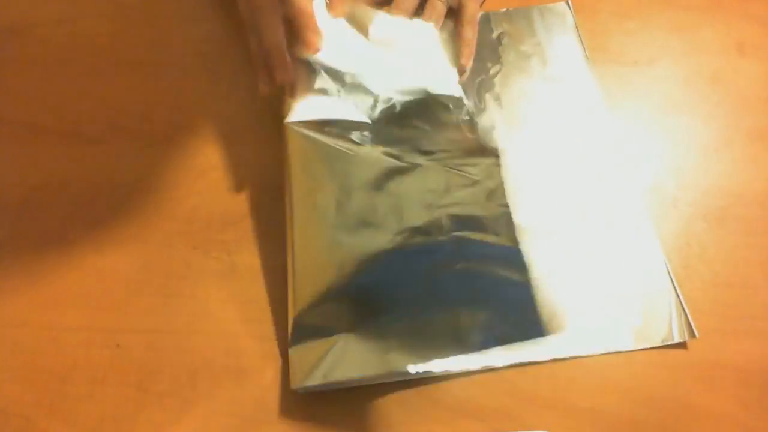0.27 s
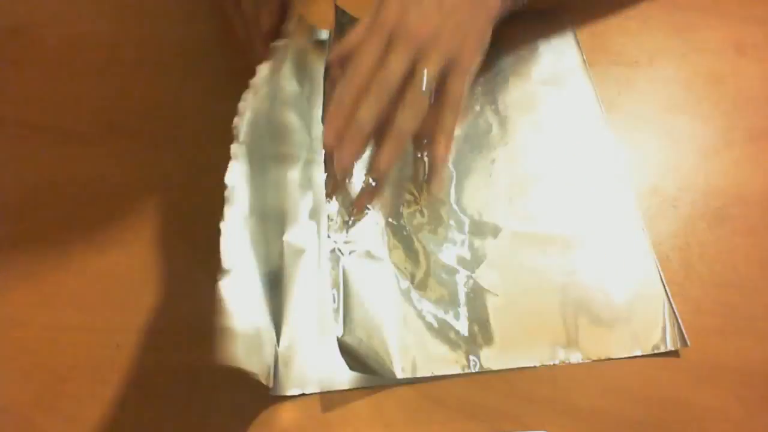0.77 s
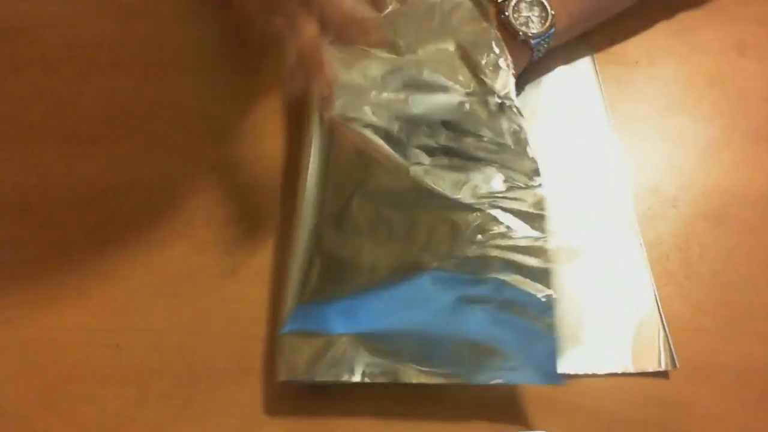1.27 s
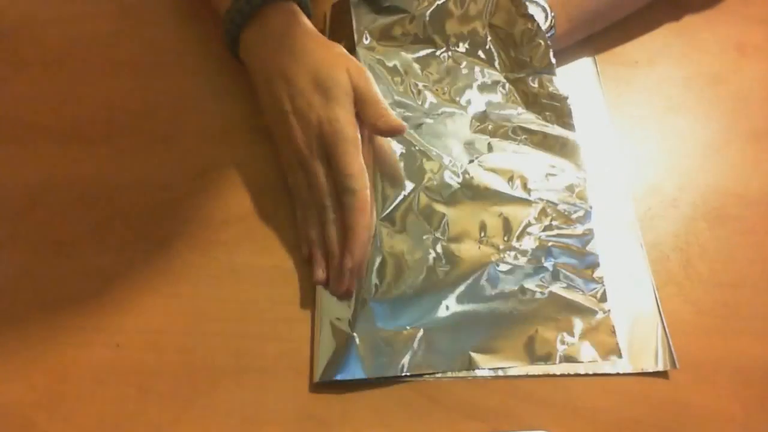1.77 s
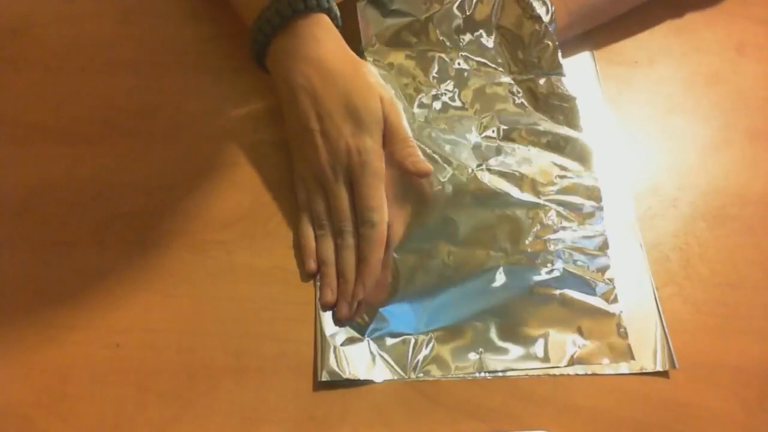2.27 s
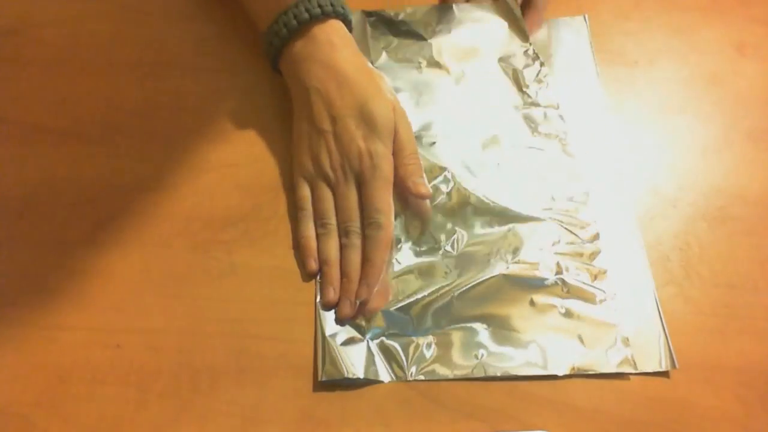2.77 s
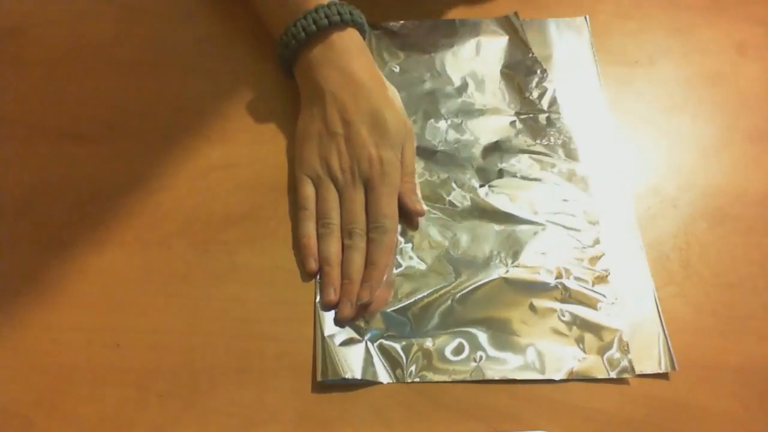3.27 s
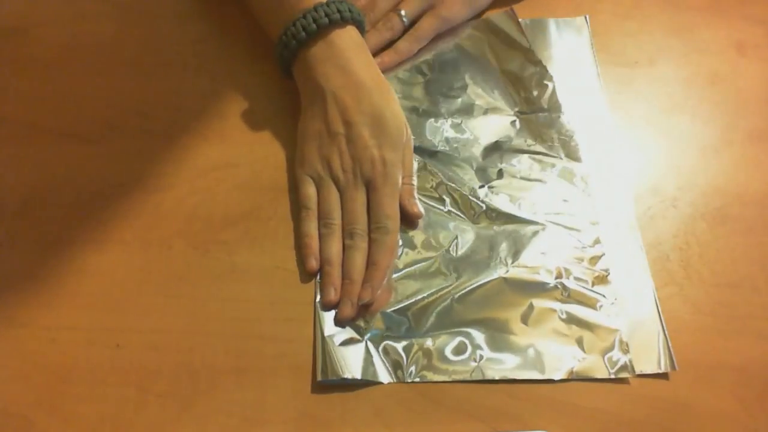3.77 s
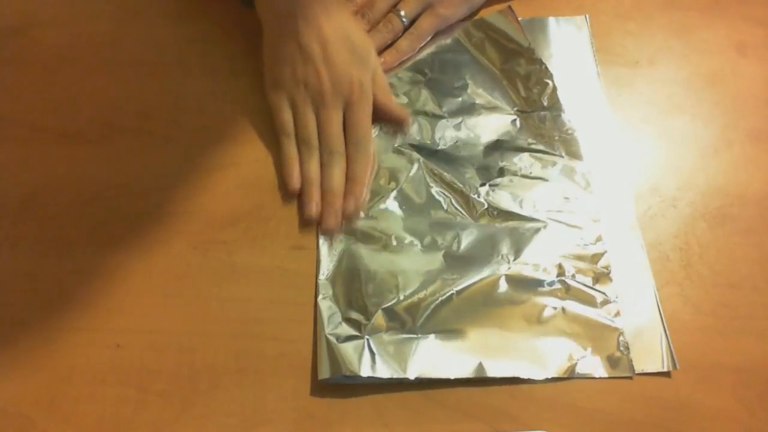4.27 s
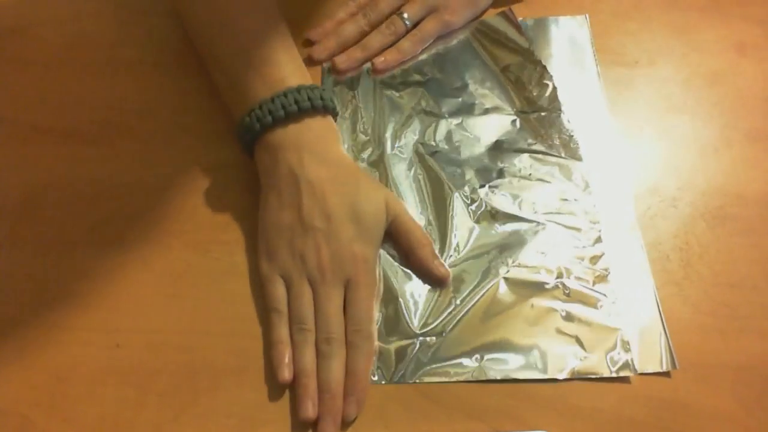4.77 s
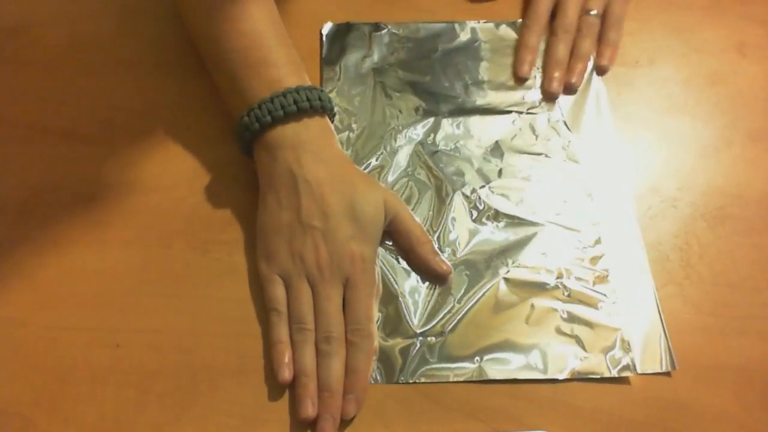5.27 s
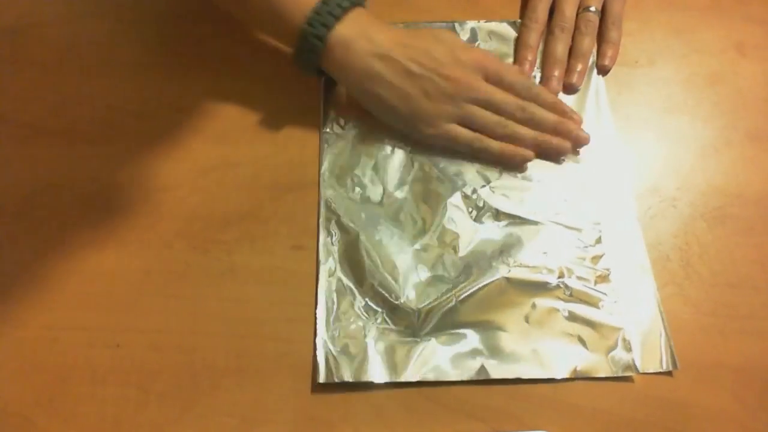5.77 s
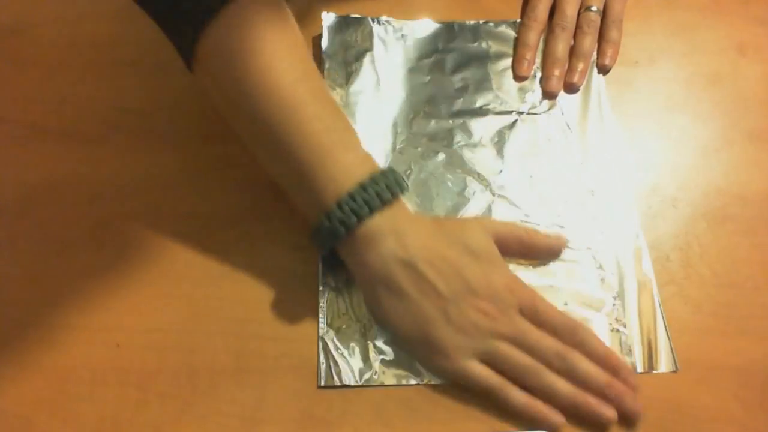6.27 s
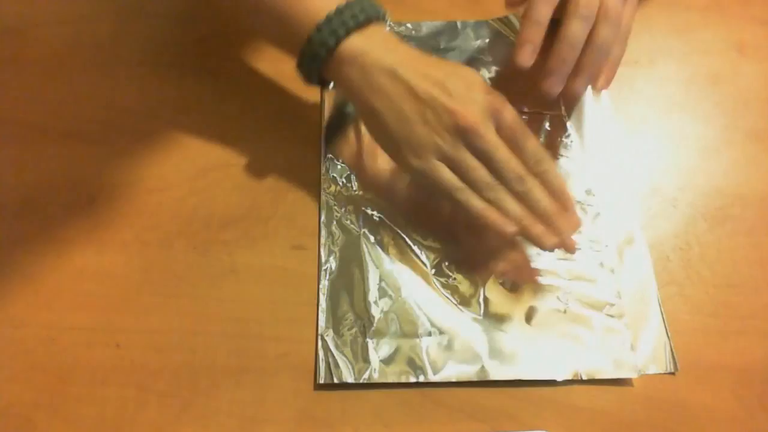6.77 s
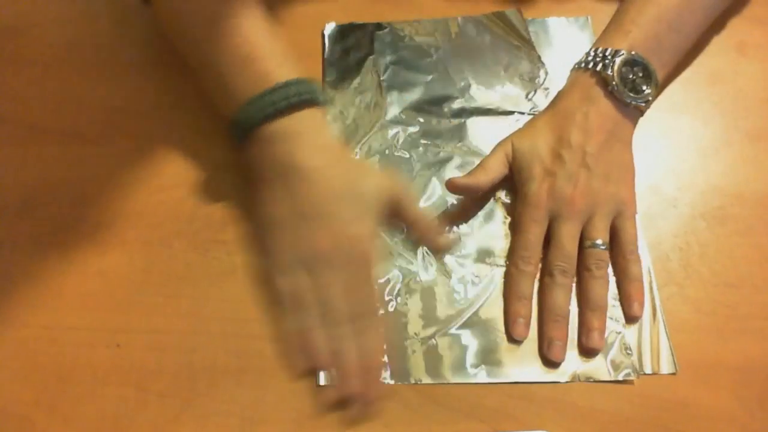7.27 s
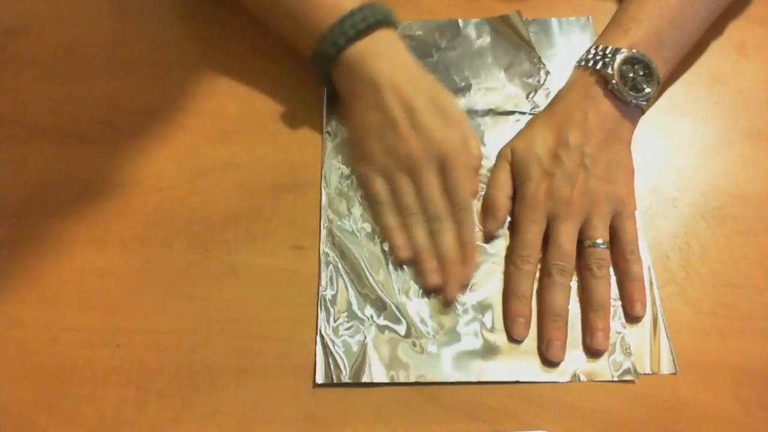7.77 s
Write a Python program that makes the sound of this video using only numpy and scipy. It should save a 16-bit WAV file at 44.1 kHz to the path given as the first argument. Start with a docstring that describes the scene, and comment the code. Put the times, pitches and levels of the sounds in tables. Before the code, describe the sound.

Close, harsh crinkling of a foil sheet being folded and wiped flat, with sharp snaps, tinny rattles and one low table shove.

```python
"""Folding foil on a table

Hands fold a sheet of aluminium foil on a table and press it flat, close to a small mono microphone.
Single snaps and dense crackle are short noise bursts, each with a noisy rattle of the sheet after it.
A lifted flap rustles hollowly; short dying sines thump, pop and ping; the room hisses.
The table gives a low hum and one heavy shove, both low tones.
The input rests far off centre; fast gain control rides the crackle and moves that offset with it."""
import sys
import numpy as np
from scipy import signal
from scipy.fft import rfft, irfft
from scipy.io import wavfile
from scipy.ndimage import uniform_filter1d

SR = 44100
rng = np.random.default_rng(int(sys.argv[2]) if len(sys.argv) > 2 else 0)


def generate_wav(sig):
    """Save sig (samples, or channels by samples) to the path in sys.argv[1] as 16-bit PCM at SR."""
    pcm = np.round(np.clip(np.atleast_2d(sig).T, -1, 1) * 32767).astype(np.int16)
    wavfile.write(sys.argv[1], SR, pcm)


N = 354431

# All levels are those ahead of the gain control; spectra give only the balance between pitches.

# Quiet room and hiss: (frequency [Hz], level [dB per Hz])
ROOM_SPECTRUM = [(41, -27), (70, -9.5), (142, -14.5), (330, -17.5), (395, -20.5), (767, -25.5), (820, -25),
                 (916, -26.5), (4520, -33.5), (14000, -32.5)]
ROOM_DB = -32

# Low hum through the table: (time [s], level [dB])
HUM_LEVEL = [(0, -31), (.3, -30), (1, -24.5), (1.8, -27), (3, -27.5), (4.6, -30), (4.8, -23), (5, -29),
             (5.4, -24.5), (6, -27), (8.04, -28.5)]
# Wavering part of the hum: (frequency [Hz], width [Hz], relative rms level [dB])
HUM_WAVERING = [(45.7, 11.4, -2.5), (27.7, 4, -12.5)]
# Steady part of the hum: (frequency [Hz], relative peak level [dB])
HUM_STEADY = [(45.5, -3), (56.8, -7.5)]

# The sheet settling between moves: (time [s], crackle level [dB])
SETTLING = [(0, -30), (1.8, -34), (2.5, -29), (3.4, -38), (4.1, -31), (4.77, -37), (5.2, -25), (5.38, -33),
            (5.5, -40), (5.74, -50), (6.16, -25), (6.4, -35), (6.7, -41), (7.15, -28), (7.4, -30),
            (7.65, -43), (8.04, -38)]
SETTLING_BODY_DB = -11  # sheet body re crackle
# Each fold, press or wipe sets off a run of crackle: (peak time [s], crackle level [dB],
# swell [s per 20 dB], hold [s], fade [s per 20 dB], sheet body re crackle [dB])
MOVES = [(.001, -23, .01, .1, .15, -5), (.205, -1.5, .008, .015, .1, -11), (.255, .6, .05, .16, .1, -12),
         (.465, .1, .05, .055, .07, -14), (.565, -6, .07, .1, .13, -18), (.735, -12, .04, .035, .07, -15),
         (.856, -3.5, .008, .05, .1, -13), (1.055, -5.5, .12, .08, .12, -13),
         (1.16, -9, .04, .06, .08, -13), (1.26, -12, .03, .12, .2, -6), (1.52, -3, .035, .07, .12, -8),
         (1.685, -1.5, .03, .04, .05, -11), (1.926, -20, .1, .2, .1, -6),
         (2.165, -7, .045, .001, .085, -10), (2.265, -3, .04, .001, .07, -13),
         (2.315, -3, .015, .04, .06, -13), (2.449, -11, .07, .001, .07, -13),
         (2.66, -19, .08, .01, .05, -10), (2.75, .6, .03, .025, .025, -16), (2.795, -5, .03, .03, .06, -16),
         (2.928, -18, .1, .1, .12, -14), (3.198, -10, .095, .001, .19, -20),
         (3.457, -13, .05, .001, .1, -20), (3.7, .6, .037, .018, .035, -18),
         (3.931, -14, .11, .001, .37, -18), (4.195, -14, .055, .001, .1, -23),
         (4.275, -9.5, .02, .07, .2, -24), (4.42, -16, .1, .04, .2, -24), (4.52, -11.5, .08, .06, .3, -24),
         (4.914, -18, .03, .19, .2, -26), (5.572, -22.5, .04, .001, .08, -16),
         (5.792, -6.5, .021, .001, .1, -22), (5.845, -10, .012, .21, .11, -19),
         (6.455, -29, .15, .001, .3, -22), (6.785, -34, .1, .001, .3, -13),
         (7.005, 2.5, .017, .02, .04, -14), (7.06, -11, .021, .03, .17, -19),
         (7.17, -17, .03, .15, .09, -17), (7.588, -28, .07, .001, .09, -19),
         (7.745, -5, .015, .032, .04, -13), (7.83, -23, .05, .06, .25, -11)]

# Small creases; a size is an exponential draw, capped, times the size spread
GRAINS_PER_S, GRAIN_MS = 500, 0.33
GRAIN_SPREAD_DB, GRAIN_CAP_SPREADS = 4.0, 3.1
FACET_SPREAD_DB = 4  # unevenness of each crease across pitch ranges
SHEET_T60_S, SHEET_DB = 0.13, -10.8  # usual rattle of the sheet after a small crease
RATTLE_FOLLOWS = 0.78  # exponent of power: the rattle grows more slowly than its crease
# How freely the sheet rattles, free in the air or damped under the palms:
# (time [s], level re the usual rattle [dB])
FREEDOM = [(0, 2), (1.7, 2), (2.2, -.1), (4.2, -.1), (4.7, .1), (4.9, -5), (5.6, -3), (6.0, -.1),
           (7.0, -1.5), (7.2, -5), (8.04, -3)]

# The louder single creases: (time [s], burst level [dB], burst length [ms],
# rattle re burst [dB], body re burst [dB])
SNAPS = [(.08, -22, 18, -3, -14), (.1507, -18, 5.3, -7, -24), (.1986, -4.5, 17, 1.5, -8),
         (.6, -5, 8, -3, -18), (.625, -3, 15, -3, -18), (.717, -6, 26, -37, -15), (.783, -15, 6, -6, -17),
         (.8085, .6, 4.5, -22, -22), (.829, -9, 3, -6, -28), (.852, -3, 4, -8, -20),
         (.9577, 1.1, 4, -3, -17), (.9869, 1.1, 4.3, -4, -17), (1.0402, -3, 1.6, -29, -29),
         (1.158, -8, 6.9, 4, -15), (1.2511, -4, 11, 2.1, -17), (1.34, -1.1, 6.2, -1.1, -21),
         (1.388, -10, 3, -3, -15), (1.432, -12, 5, -3, -15), (1.513, -9, 8.9, 2.1, -18),
         (1.581, -6, 23, -4, -11), (1.6694, 2.1, 4.8, -6, -11), (1.7925, -19, 2.5, -8, -22),
         (1.8509, -13, 1.1, -9, -3), (1.8905, -10.5, 3, -12, -7), (1.9065, -6.5, 12, -.6, -11),
         (1.934, -10, 8, -3, -11), (1.955, -5, 8, 2.1, -12), (2.0352, -2.1, 2.5, -10, -13.5),
         (2.044, -10, 12, -3, -16), (2.014, -8, 1.1, -8, -14), (2.0946, -11, 6.4, -11, -13),
         (2.138, -6, 6.5, -8, -21), (2.1536, -9, 8.2, 2.1, -11), (2.1784, -10.5, 7.9, 1.1, -14),
         (2.234, -7, 3.5, -9, -12), (2.25, -.6, 2.9, -4, -11), (2.3035, -5, 9, -3, -12),
         (2.349, -5, 5, -4, -11), (2.4235, -5, 7, -8, -12), (2.4404, -8.5, 12, -1.1, -15.5),
         (2.5406, -16, 6, -4, -8), (2.571, -17, 12, -4, -12), (2.684, -8.5, 9, -12, -11),
         (2.714, -13, 8, -8, -10), (2.7253, -3, 14, -8, -27), (2.9062, -8, 1.3, -8, -9),
         (2.9163, -5.5, 7.4, 1.1, -13.5), (2.966, -8, 20, -6, -25), (3.0075, -9.5, 8, 1.1, -13),
         (3.022, -6, 2.5, -8, -15), (3.079, -13, 4, -10, -14), (3.103, -15, 5, -10, -12),
         (3.1157, -8, 12, -6, -14), (3.1347, -11, 3.9, -12, -22), (3.163, -14, 12, -6, -25),
         (3.1809, -2.1, 8, -2.1, -13), (3.2, -8, 12, -3, -14), (3.241, -5, 4.8, -11, -18),
         (3.3002, -9, 2.8, -5, -15), (3.308, -12, 3.1, .1, -12), (3.3244, -11.5, 12, -3, -21),
         (3.359, -5, 1.5, -13, -17), (3.4012, -13, 8, -4, -10.5), (3.4378, -1.1, 8.4, -7, -29),
         (3.4713, -10.5, 6, -12, -30), (3.5763, -16.5, 1.4, -9, -24), (3.622, -20, 1.5, -20, -30),
         (3.6384, -19, 6.5, -11, -7), (3.6583, -11, 5.1, -11, -12), (3.6752, -1.5, 8.1, -1.1, -18),
         (3.751, -5, 1.8, -10, -22), (3.76, -12, 1.5, -8, -12), (3.7985, -8, 4, -9, -22),
         (3.8394, -10.5, 2.2, -13, -25), (3.8694, -11, 2.6, -16, -8), (3.8812, -11, 1.5, -17, -28),
         (3.9125, -4.5, 6, -8, -17), (3.9675, -3, 2.4, -6, -28), (3.993, -9, 2.5, -6, -20),
         (4.001, -8, 2.5, -6, -24), (4.0271, -4, 1.1, -26, -25), (4.0465, -7, 1.7, -12, -21),
         (4.129, -14, 2.5, -13, -15), (4.1786, -1.1, 2.1, -5, -26), (4.188, -5, 4.4, -3, -27),
         (4.2112, -9, 2.2, -9, -25), (4.2633, -4, 8, -3, -22), (4.3317, -9, 2.1, -9, -23),
         (4.408, -3, 2.1, -16, -25), (4.419, -5, 9.8, -11, -13), (4.457, -4, 1.8, -16, -26),
         (4.4824, -14, 5.6, 5, -15), (4.494, -8, 6, -3, -14), (4.508, -8, 3, -5, -15),
         (4.5415, -2.1, 3, -3, -16.5), (4.572, -9, 6, -3, -17), (4.602, -12, 6, -3, -22),
         (4.6422, -15, 16, 1.1, -21), (4.6776, -8, 9, -6, -22), (4.7056, -13, 4.4, -.6, -21),
         (4.7252, -5.5, .91, -8, -18), (4.78, -14, 2.6, -15, -6), (4.7898, -15, 1.1, -21, -24),
         (4.847, -6, 1.5, -18, -19), (4.881, -16, 1.5, -12, -25), (4.891, -4.5, 1.2, -17, -22),
         (4.903, -8, 4.5, -4, -25), (4.917, -10, 1.5, -10, -25), (4.931, -8, 4, -9, -22),
         (4.9456, -3.5, 5.4, -9, -24), (4.9764, -5, 7, -9, -24), (4.992, -5, 2.6, -21, -30),
         (5.0074, -5.5, 1.9, -8, -19), (5.016, -5, 2.5, -9, -18), (5.022, -7, 5, -9, -16),
         (5.05, -9, 2.5, -11, -12), (5.063, 2.1, 1.6, -26, -27), (5.087, -9, 4, -12, -22),
         (5.0975, 4, 3.4, -17, -17), (5.1111, -4, 2.6, -7, -35), (5.132, -7.5, 2.4, -2.1, -32),
         (5.1765, -9, 6, -6, -34), (5.196, -13, 1.5, -14, -30), (5.202, -6, 1.5, -14, -34),
         (5.2138, -9, 1.1, -11, -36), (5.282, -19, 3, -6, -30), (5.338, -13, 5.5, -10, -30),
         (5.359, -15, 4.5, -7, -32), (5.373, -20, 3, -6, -30), (5.418, -19, 3, -8, -20),
         (5.501, -23, 1.5, -12, -22), (5.522, -9, 1.6, -14, -18), (5.5482, -11.5, 2.9, -12, -29),
         (5.555, -9, 6, -3, -25), (5.587, -11, 3.6, -7, -17), (5.7692, -1.5, 18, -12, -15.5),
         (5.8355, -4.5, 5, -1.1, -21), (5.8777, -6, 7.6, 3.5, -12), (5.896, -4, 7, -8, -15),
         (5.9288, -3, 4, -9, -20), (5.944, -2.1, 5.4, -13, -12), (5.978, .1, 1.9, -21, -26),
         (6.008, .6, 2.9, -9, -18), (6.04, -4.5, 12, -1.1, -15), (6.068, -5, 6, -3, -18),
         (6.0925, -8, 6.4, -11, -19), (6.119, -5, 2.1, -8, -16), (6.144, -16, 1.9, -2.1, -7),
         (6.1825, 5, .33, -24, -31), (6.1912, -10.5, 3.9, -17, -24), (6.2353, -14, 3.2, .1, -26),
         (6.2675, -7.5, 2.6, -6, -18), (6.3322, -9.5, 3.1, -8, -27), (6.359, -15, 1.6, -13, -27),
         (6.3977, -18, 2, -6, -11), (6.403, -17, 2.5, -8, -14), (6.429, -19, 5, -4, -11),
         (6.433, -12, 6, -3, -13), (6.4445, -15, 3, -8, -13), (6.461, -15, 1.2, -4, -11),
         (6.5457, -10.5, 1.4, -9, -40), (6.6494, -17.5, 1.3, 3, -33), (6.6979, -16, 2.9, 2.5, -36),
         (6.7646, -13, 5, -5, -31), (6.7765, -14, 11, .1, -24), (6.982, -14, 9, -11, -8),
         (6.9874, 3, 19, -6, -12), (7.057, -10, 2.4, -4, -38), (7.0957, -7.5, 1.6, .1, -19),
         (7.158, -3, 1.1, -20, -32), (7.1655, -5, 7, -18, -15), (7.1883, -7, 6.3, -9, -31),
         (7.209, -8.5, 9.8, -11, -23), (7.215, -7, 1.5, -9, -18), (7.222, -12, 2.5, -12, -22),
         (7.23, -13, 3.9, -18, -33), (7.254, 1.1, 1.1, -14, -21), (7.2624, -9, 5.4, -9, -24),
         (7.2802, -5, 1.1, -13, -27), (7.287, -13, 1.5, -12, -9), (7.304, -9, 4, -6, -25),
         (7.309, -6, 2.5, -8, -32), (7.324, -5, 1.5, -12, -30), (7.35, -12, 3, -14, -13),
         (7.3735, -21, 9.1, -7, -19), (7.4532, -9, .9, -11, -31), (7.4726, -17.5, 1.6, -4, -13),
         (7.508, -19, 2.4, -5, -14), (7.515, -12, 5, -6, -20), (7.57, -8.5, .97, -7, -34),
         (7.5933, -14.5, 1.3, -5, -29), (7.615, -22, 1.5, -20, -3), (7.6852, -22, .75, -28, -21),
         (7.7207, -12, .91, -14, -27), (7.727, -15, 1.1, -12, -28), (7.737, -5, 9.7, -2.1, -26),
         (7.8172, -6, .9, -24, -34), (7.831, -15, 3, -8, -15), (7.8447, -14, 4.7, -11, -8),
         (7.8822, -3, 3.2, -14, -19), (7.896, -15, 3.6, -3, -15), (7.9202, -8, 1.5, -16, -22),
         (7.933, -9, 1.7, -12, -25), (7.9385, -7, 1.5, -12, -28), (7.9507, -13, 5.1, -9, -30),
         (7.9805, -6.5, 2.2, -5, -30)]
SNAP_CLICK_DB = 8.5  # first click re its burst
SNAP_COLOUR_DB = 3.2  # each snap favours pitch ranges of its own
GRIT_DB, GRIT_MS = 2.2, 0.5  # unevenness of the cracks within one snap, and their length
# Ring time of a rattle as loud as its burst; dB of ring time per dB of rattle
RATTLE_T60_S, RATTLE_GROWTH = 0.12, 0.25

# Crackle as the microphone colours it: (frequency [Hz], level [dB per Hz])
BRIGHT_SPECTRUM = [(1800, -60.5), (3000, -24), (4000, -17.5), (5200, -8.5), (6400, -5), (7700, -2),
                   (8600, -3), (9800, -7), (11600, -9), (13000, -18.5), (16000, -48.5)]
# Flexing sheet: (frequency [Hz], level [dB per Hz])
BODY_SPECTRUM = [(60, -26), (200, -17), (450, .6), (800, 4), (1200, 9.5), (1700, 10.5), (2400, 9),
                 (3400, 3.5), (5000, 11), (8000, -58)]
# Top treble: (time [s], level re crackle [dB])
TOP_LEVEL = [(0, 3), (2.8, 2.5), (4.2, -1), (4.4, -13), (5.1, -8), (5.6, 2.5), (5.9, -10), (6.6, 2.5),
             (7.05, 3), (7.5, -18), (7.8, 3)]
# Slack; a loose sheet sounds fuller at the lower edge of the crackle: (time [s], level re crackle [dB])
SLACK_LEVEL = [(0, -17), (.5, -4.5), (.76, -5), (.82, -18), (.87, -4.5), (1.6, -4), (2, 2.5), (2.4, -3.5),
               (2.8, -5), (3.3, -2.1), (3.6, -6), (4.28, -1.1), (4.72, -4), (4.9, -26), (5.75, -16),
               (6.05, -4), (6.2, -18), (7, -18), (7.4, -31), (8.04, -20)]

# The lifted flap sways and bows with a steady hollow rustle: (time [s], level [dB])
SWAY_LEVEL = [(.15, -60), (.25, -27), (.55, -30), (.75, -31), (.8, -42), (.845, -42), (.87, -32),
              (1.0, -29), (1.2, -31), (1.245, -33), (1.28, -22), (1.4, -25), (1.48, -25), (1.6, -23),
              (1.73, -25), (1.8, -33), (1.85, -40), (1.95, -34), (2.3, -34), (2.6, -41), (3.0, -36),
              (3.4, -39), (3.55, -60)]
# Hollow of the swaying flap: (frequency [Hz], level [dB per Hz])
FLAP_SPECTRUM = [(120, -30), (300, -19), (700, -7), (1100, -1.5), (1400, -3), (1800, -.1), (2300, -4),
                 (3200, -7), (4500, -7), (6500, -14), (10000, -40)]
SWAY_FLEXES_PER_S, SWAY_SPREAD_DB = 4000, 3.0

# Short dying tones, low thumps, hollow pops and high pings:
# (time [s], level [dB], frequency [Hz], time to fall 60 dB [s])
SHORT_TONES = [(.9572, -12, 280, .012), (0.958, -17, 100, .08), (2.034, -12, 202, 0.034),
               (2.918, -14, 2050, .02), (2.982, -21, 1500, .03), (3.022, -15, 1650, .025),
               (3.182, -14, 1800, .02), (3.25, -19, 1450, .025), (3.309, -17, 1440, 0.065),
               (3.401, -16, 1500, .03), (4.27, -15.5, 270, 0.15), (.842, -13, 7700, .02),
               (1.283, -16, 1150, .06), (1.29, -17, 1650, .05), (1.432, -16, 1700, .04),
               (1.545, -14, 1550, .04), (1.638, -14, 2300, .03), (3.039, -19, 1550, .03),
               (3.08, -19, 2050, .015), (3.335, -22, 1450, .06), (4.7815, -18, 1500, .012),
               (4.8145, -15, 3300, .005), (4.98, -17, 1900, .012), (5.0995, -13, 2300, .008),
               (6.398, -11, 1850, .01), (6.3982, -18, 2700, .01), (6.4035, -16, 2450, .012),
               (6.4038, -22, 3900, .01), (7.166, -17, 650, .025), (7.189, -19, 1650, .02),
               (7.263, -19, 550, .025), (7.287, -20, 500, .02), (1.3, -15, 1100, .05),
               (3.118, -13, 1520, .03), (6.401, -19, 1750, .03), (6.4038, -9, 1750, 0.012),
               (6.414, -24, 1700, .02), (6.4612, -14, 1300, .005), (6.434, -16, 1700, .015),
               (6.431, -17, 4000, .02), (6.445, -21, 1640, .05)]

# Both palms lean on the table: (time [s], level [dB])
SHOVE_LEVEL = [(7.0, -60), (7.04, -10), (7.12, -4), (7.15, -8), (7.19, -48)]
SHOVE_HZ = 45.8

# Microphone input and its gain control
REST_OFFSET = -0.42  # full scale, ahead of the gain control
FAST_S, SLOW_S, SLOW_SHARE = 0.0062, 1, 0.53
HALF_GAIN_LEVEL = 0.55  # followed level that halves the gain
RAIL, KNEE = 0.58, 4.5  # limit [full scale] and sharpness of its bend
STOP_HZ = 14500  # stopband edge of the treble cut


def amp(db):
    """Gain of a level in dB; twice the dB gives the factor on power."""
    return 10 ** (np.asarray(db) / 20)


def rms_one(x):
    """Scale to rms 1."""
    return x / np.sqrt(np.mean(x ** 2) + 1e-20)


def in_time(rows):
    """Join (time, level) points by straight lines, held before and after."""
    seconds, level = np.transpose(rows)
    return np.interp(np.arange(N) / SR, seconds, level)


def band_pass(x, edges_hz, order):
    """Butterworth band between two edges."""
    return signal.sosfilt(signal.butter(order, edges_hz, "band", fs=SR, output="sos"), x)


def colour(x, spectrum):
    """Minimum-phase filter of the given dB per Hz, scaled so that white noise keeps its rms."""
    size = 8192
    hz, db = np.transpose(spectrum)
    bins_hz = np.arange(size // 2 + 1) * SR / size
    log_gain = np.log(amp(np.interp(np.log(bins_hz + 1), np.log(hz), db)))
    # Folding the cepstrum onto positive time makes the response minimum-phase
    cepstrum = irfft(log_gain)
    cepstrum[1:size // 2] *= 2
    cepstrum[size // 2 + 1:] = 0
    response = irfft(np.exp(rfft(cepstrum)))
    return signal.oaconvolve(x, response / np.sqrt(np.sum(response ** 2)))[:N]


def resonance(x, hz, width_hz):
    """Two-pole resonance with a peak gain of 1."""
    r = np.exp(-np.pi * width_hz / SR)
    feedback = [1, -2 * r * np.cos(2 * np.pi * hz / SR), r * r]
    return signal.lfilter([(1 - r * r) / 2, 0, (r * r - 1) / 2], feedback, x)


def dying(t60):
    """Envelope, cut at 0.3 s, that falls 60 dB in t60 seconds."""
    return amp(-60 * np.arange(int(0.3 * SR)) / SR / t60)


def burst(length_ms, rattle_db, t60):
    """Power of one crease: a short run of cracks that stops abruptly, over a rattle that dies away."""
    rattle = dying(np.clip(t60, 0.01, 0.4))
    ms = np.arange(len(rattle)) / SR * 1000
    cracks = np.exp(-(ms / max(length_ms, 0.2)) ** 2)
    return cracks + amp(2 * rattle_db) * rattle ** 2


def room_hiss():
    """Steady noise of the quiet room, white noise coloured by its spectrum."""
    return amp(ROOM_DB) * colour(rng.standard_normal(N), ROOM_SPECTRUM)


def table_hum():
    """Low hum: noise through narrow resonances wavers, sines stay steady, and one level curve rides both."""
    hum = 0
    for hz, width_hz, db in HUM_WAVERING:
        noise = rng.standard_normal(N + SR)
        # The first second lets the resonances build up
        mode = resonance(resonance(noise, hz, width_hz), hz, width_hz)[SR:]
        hum = hum + amp(db) * rms_one(mode)
    t = np.arange(N) / SR
    for hz, db in HUM_STEADY:
        hum = hum + amp(db) * np.sin(2 * np.pi * (hz * t + rng.random()))
    return amp(in_time(HUM_LEVEL)) * rms_one(hum)


def handling():
    """Gains of crackle and body: every move swells, holds and fades; powers add over the settling rustle."""
    t = np.arange(N) / SR
    crackle = amp(2 * in_time(SETTLING))
    body = crackle * amp(2 * SETTLING_BODY_DB)
    for s, db, swell_s, hold_s, fade_s, body_db in MOVES:
        swell = 20 * np.maximum((s - t) / swell_s, 0)
        fade = 20 * np.maximum((t - s - hold_s) / fade_s, 0)
        power = amp(2 * (db - swell - fade))
        crackle = crackle + power
        body = body + power * amp(2 * body_db)
    return np.sqrt(crackle), np.sqrt(body)


def grains():
    """Small creases flip at random, each a short burst uneven across pitch ranges, then a rattle.

    Three rows share the creases but not the fine noise: bright part, body and lower edge."""
    crack = burst(GRAIN_MS, -99, SHEET_T60_S)[:200]  # the rattle is added apart
    keep = amp(-2 * 60 / (SHEET_T60_S * SR))  # share of rattle power left after one sample
    rattle_gain = amp(2 * (SHEET_DB + in_time(FREEDOM)))
    spreads = np.minimum(rng.exponential(1, N), GRAIN_CAP_SPREADS)
    happens = rng.random(N) < GRAINS_PER_S / SR
    sizes = amp(2 * GRAIN_SPREAD_DB * spreads) * happens
    edges = np.geomspace(50, 16000, 9)
    out = 0
    for low, high in zip(edges, edges[1:]):
        share = sizes * amp(2 * FACET_SPREAD_DB * rng.standard_normal(N))
        push = share ** RATTLE_FOLLOWS
        push = push * share.mean() / push.mean()
        # The sheet is already rattling at its mean level when the sound begins
        rattle = signal.lfilter([1], [1, -keep], push, zi=[push.mean() / (1 - keep)])[0]
        power = np.abs(signal.oaconvolve(share, crack)[:N]) + rattle_gain * rattle
        noise = band_pass(rng.standard_normal((3, N)), [low, high], 2)
        out = out + noise * rms_one(np.sqrt(power))
    return rms_one(out)


def snaps():
    """Single creases, each a sharp click and a gritty run of noise: returns bright part, body, lower edge."""
    bright_edges = [(1500, 5000), (5000, 7500), (7500, 10500), (10500, 16000)]
    body_edges = [(50, 1100), (1100, 2200), (2200, 9000)]
    power, click = np.zeros((2, 7, N + SR))  # one row per pitch range
    favours = amp(2 * SNAP_COLOUR_DB * rng.standard_normal((len(SNAPS), 7)))
    for (s, burst_db, length_ms, rattle_db, body_db), favour in zip(SNAPS, favours):
        i = round(s * SR)
        # Louder rattles ring longer
        shape = burst(length_ms, rattle_db, RATTLE_T60_S * amp(RATTLE_GROWTH * rattle_db))
        bright_share = favour[:4] / favour[:4].mean()
        body_share = amp(2 * body_db) * favour[4:] / favour[4:].mean()
        strength = amp(2 * burst_db) * np.concatenate([bright_share, body_share])
        power[:, i:i + len(shape)] += strength[:, None] * shape
        click[:, i] = amp(SNAP_CLICK_DB) * np.sqrt(strength)
    crack_samples = max(round(GRIT_MS * SR / 1000), 1)
    unevenness = rms_one(uniform_filter1d(rng.standard_normal(N + SR), crack_samples))
    grit = amp(2 * GRIT_DB * unevenness)
    push = np.sqrt(power * grit / grit.mean())[:, :N]
    click = click[:, :N]
    ranges = []
    for edges, envelope, clicks in zip(bright_edges + body_edges, push, click):
        ranges.append(band_pass(envelope * rng.standard_normal(N) + clicks + 1e-18, edges, 2))
    # The lower edge follows the lowest bright range; foil() filters it
    lower_edge = push[0] * rng.standard_normal(N) + click[0]
    return sum(ranges[:4]), sum(ranges[4:]), lower_edge


def foil():
    """One train of creases drives the bright crackle, its two edges and the body of the sheet alike."""
    crackle_gain, body_gain = handling()
    snap_bright, snap_body, snap_edge = snaps()
    grain_bright, grain_body, grain_edge = grains()
    bright = crackle_gain * grain_bright + snap_bright
    body = body_gain * grain_body + snap_body
    edge = crackle_gain * grain_edge + snap_edge
    top = band_pass(amp(in_time(TOP_LEVEL)) * bright, [11900, 14500], 3)
    slack = band_pass(amp(in_time(SLACK_LEVEL)) * edge, [2500, 4800], 2)
    return colour(bright, BRIGHT_SPECTRUM) + colour(body, BODY_SPECTRUM) + top + slack


def sway():
    """Very dense small flexes of the lifted flap, random pulses of either sign heard through its hollow."""
    sizes = amp(SWAY_SPREAD_DB * rng.exponential(1, N))
    signs = rng.choice([-1, 1], N)
    happens = rng.random(N) < SWAY_FLEXES_PER_S / SR
    flexes = rms_one(sizes * signs * happens)
    return amp(in_time(SWAY_LEVEL)) * colour(flexes, FLAP_SPECTRUM)


def short_tones():
    """Low thumps, hollow pops and high pings, each one sine that dies away."""
    out = np.zeros(N)
    for s, db, hz, t60 in SHORT_TONES:
        envelope = dying(t60)
        ring = envelope * np.sin(2 * np.pi * hz * np.arange(len(envelope)) / SR)
        start = round(s * SR)
        out[start:start + len(ring)] += amp(db) * ring
    return out


def shove():
    """Both palms lean on the table: one low tone that swells and falls away."""
    t = np.arange(N) / SR
    return amp(in_time(SHOVE_LEVEL)) * np.cos(2 * np.pi * SHOVE_HZ * (t - 7.11))


def scene():
    """Foil, flap, short tones, table and room at the one microphone, alike in both channels."""
    sheet = foil() + sway()
    table = table_hum() + shove()
    return np.tile(sheet + short_tones() + table + room_hiss(), (2, 1))


def follow(x, tau_s):
    """One-pole average of the magnitude, starting from the level of the first moments."""
    r = np.exp(-1 / (tau_s * SR))
    start = np.mean(np.abs(x[:, :2000]), axis=1, keepdims=True)
    return signal.lfilter([1 - r], [1, -r], np.abs(x), zi=r * start)[0]


def record(dry):
    """Gain falls with level and scales the offset too; overshoots bend into two rails; the top is cut."""
    level = follow(dry, FAST_S) + SLOW_SHARE * follow(dry, SLOW_S)
    ridden = (dry + REST_OFFSET) / (1 + level / HALF_GAIN_LEVEL)
    drive = ridden / RAIL
    squeezed = RAIL * drive / (1 + np.abs(drive) ** KNEE) ** (1 / KNEE)
    treble_cut = signal.cheby2(12, 45, STOP_HZ, fs=SR, output="sos")
    return signal.sosfiltfilt(treble_cut, squeezed)


dry = scene()
out = record(dry)
generate_wav(out)
```